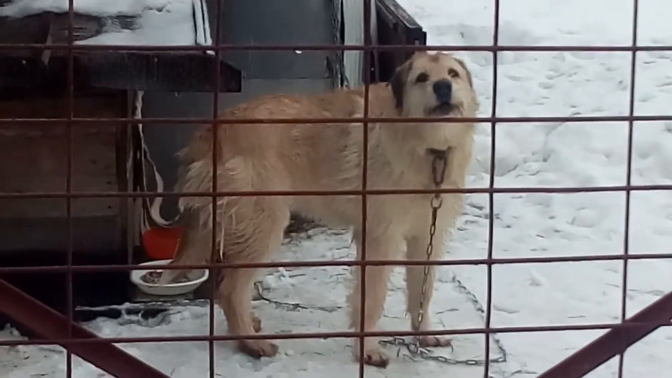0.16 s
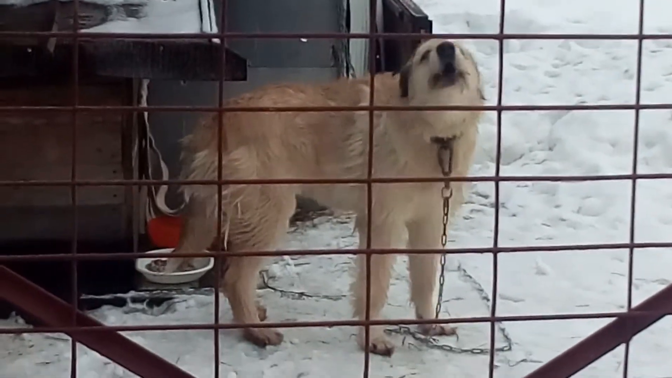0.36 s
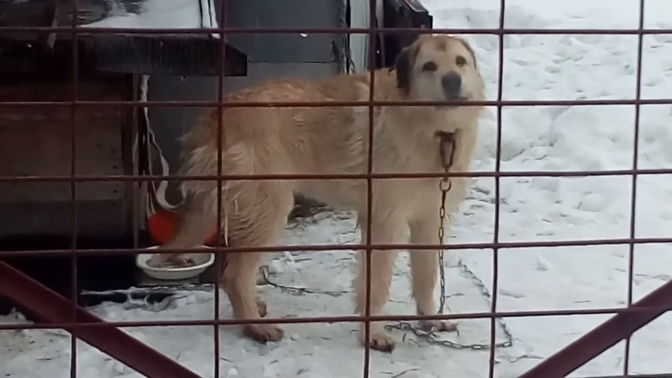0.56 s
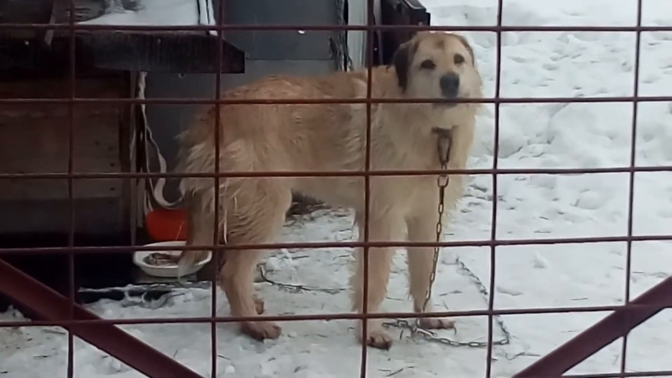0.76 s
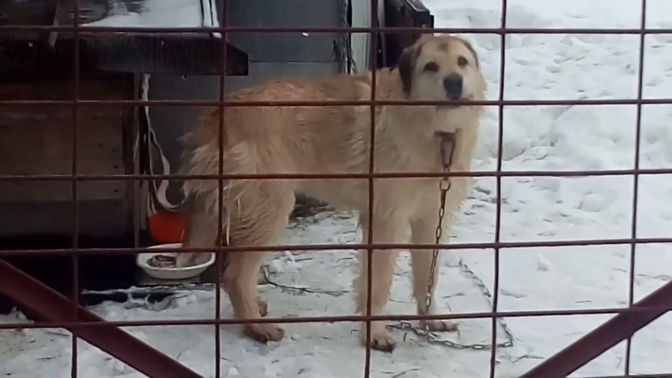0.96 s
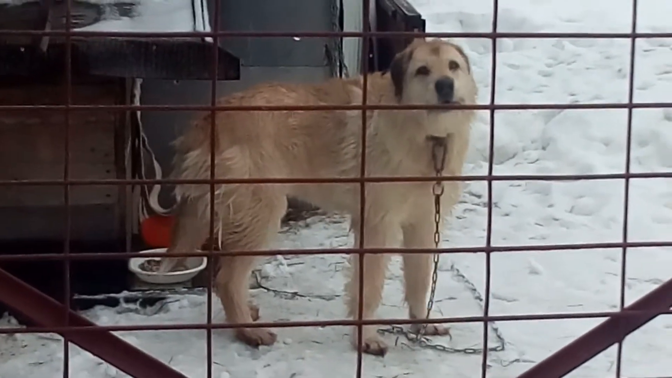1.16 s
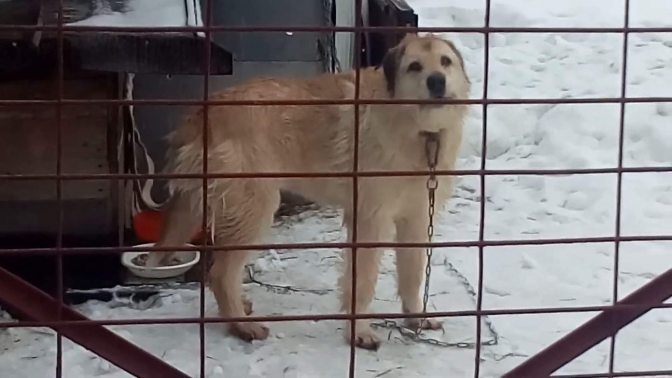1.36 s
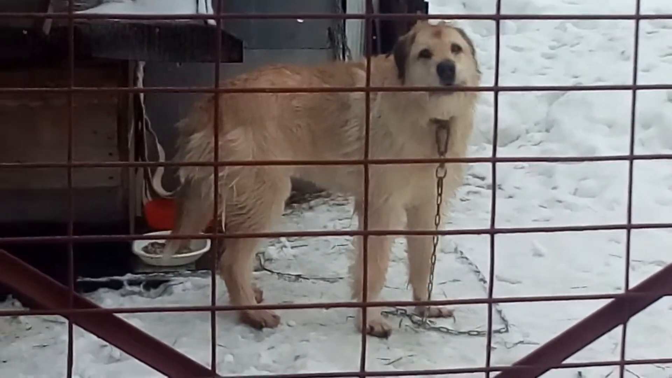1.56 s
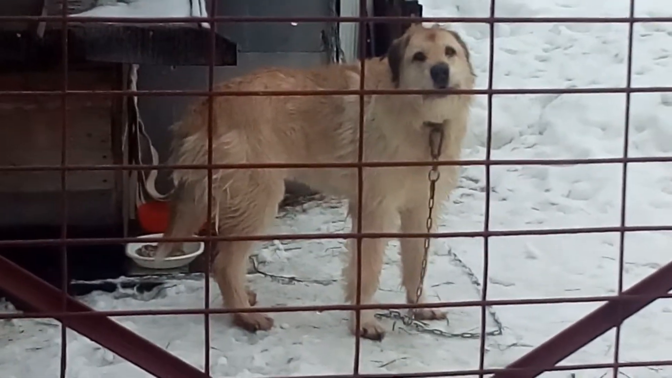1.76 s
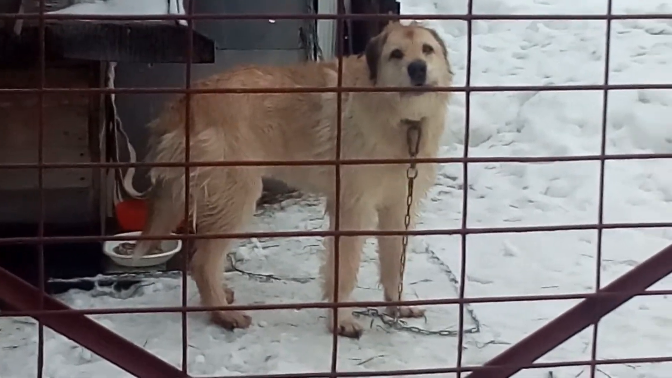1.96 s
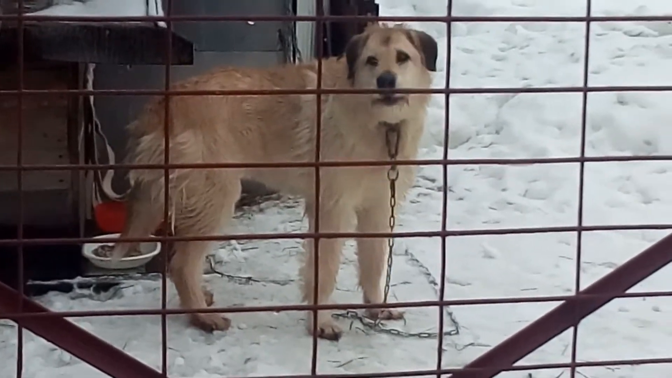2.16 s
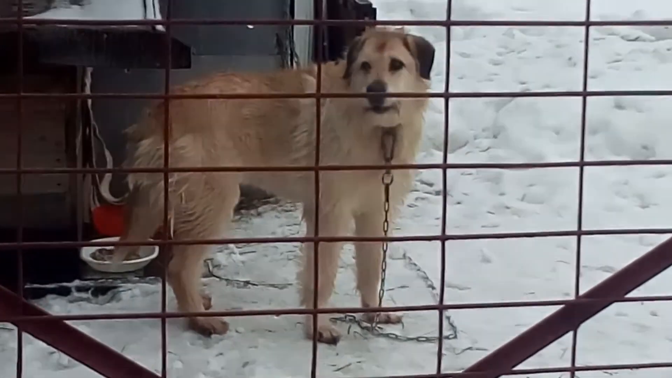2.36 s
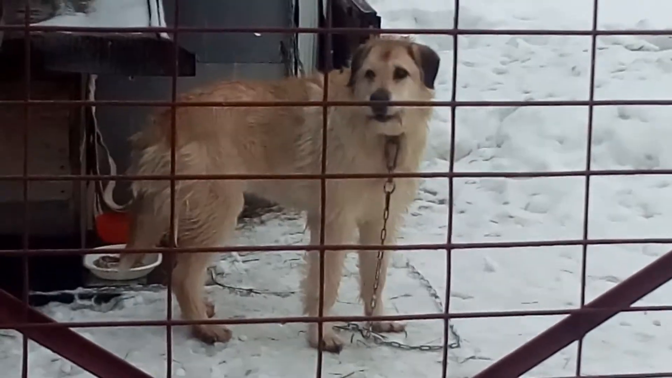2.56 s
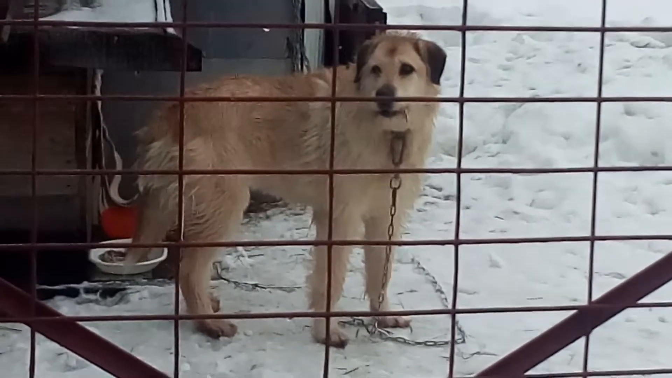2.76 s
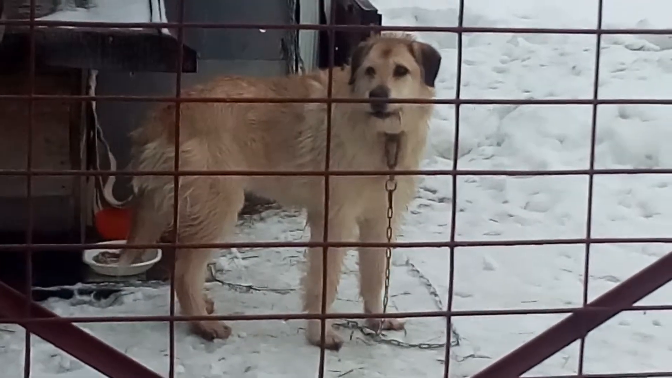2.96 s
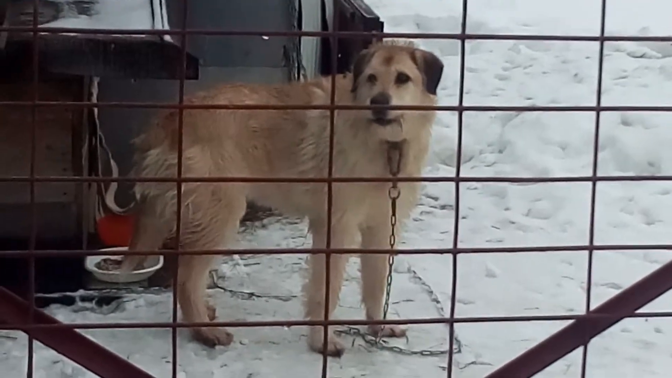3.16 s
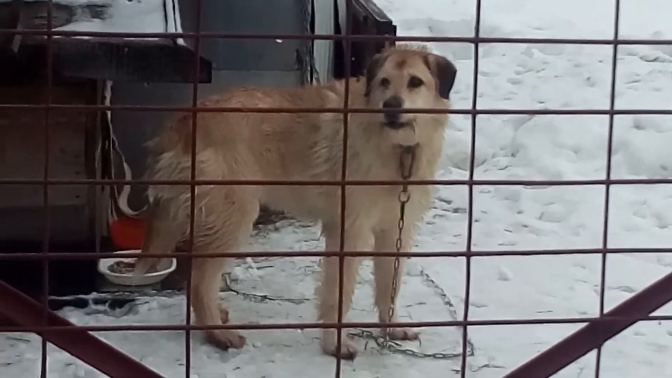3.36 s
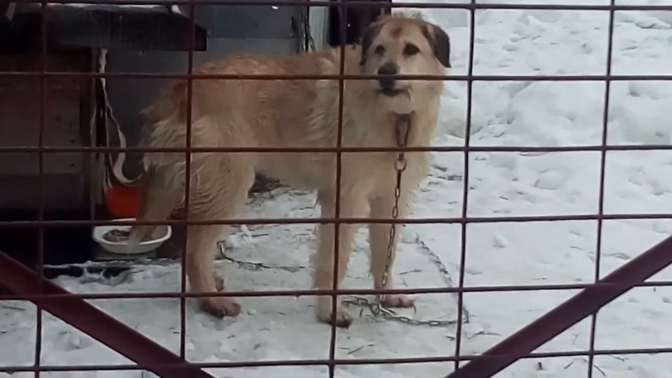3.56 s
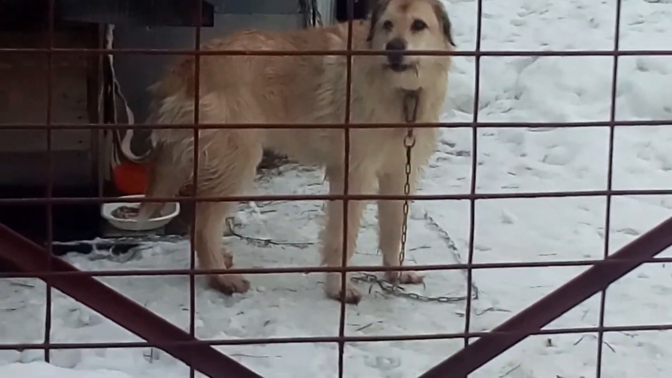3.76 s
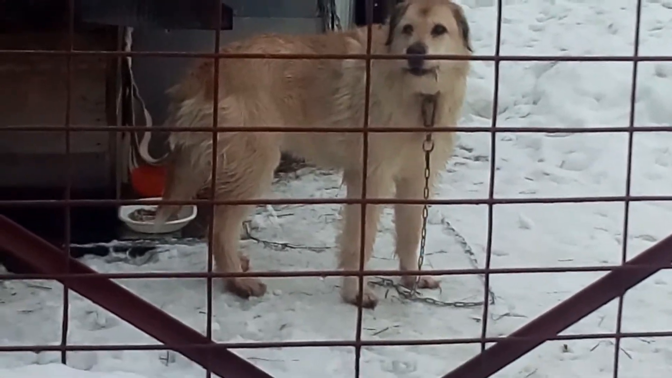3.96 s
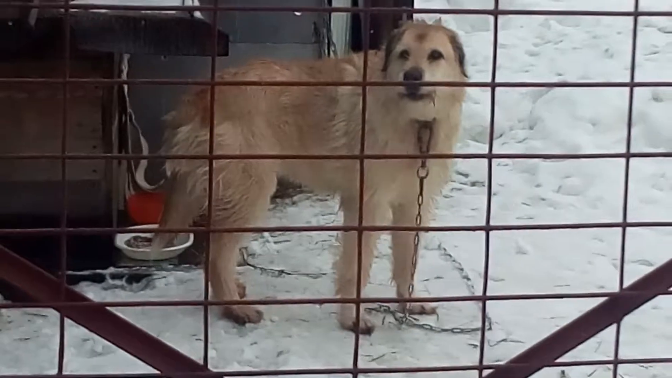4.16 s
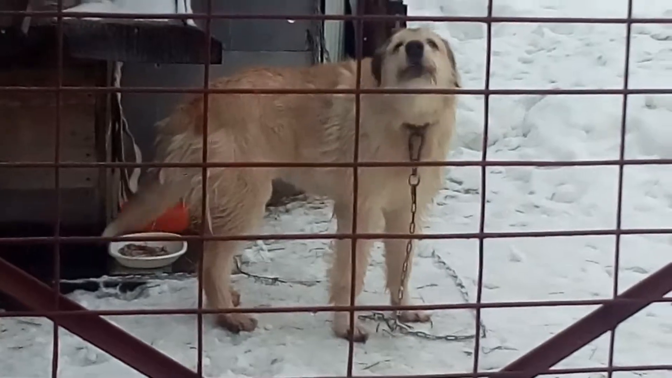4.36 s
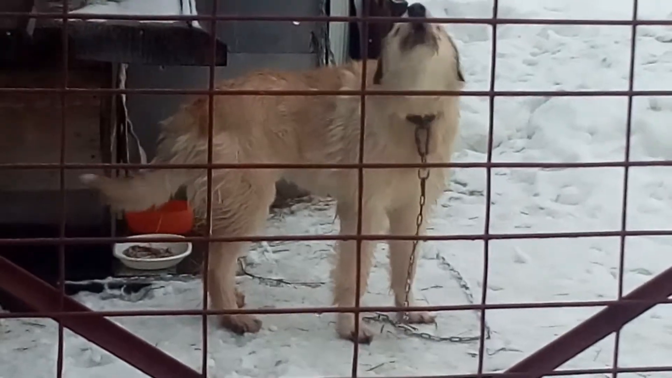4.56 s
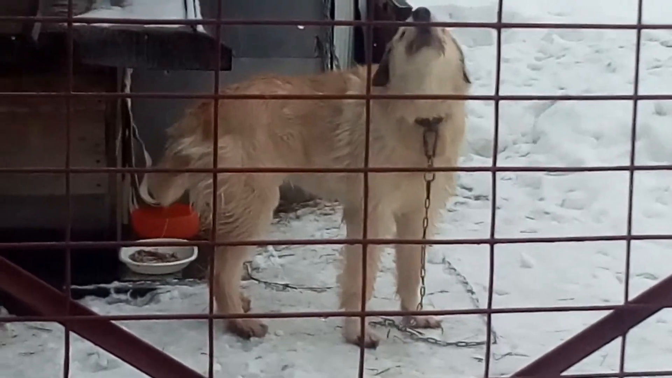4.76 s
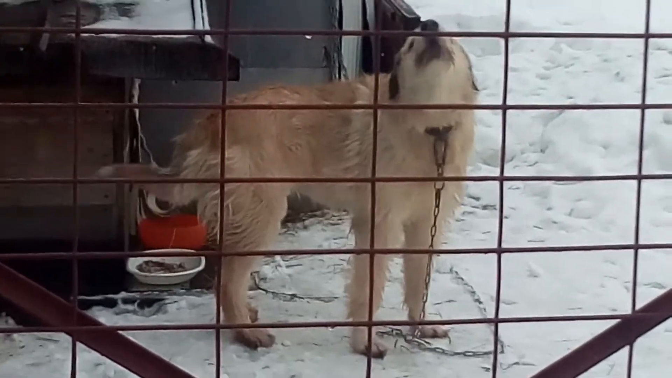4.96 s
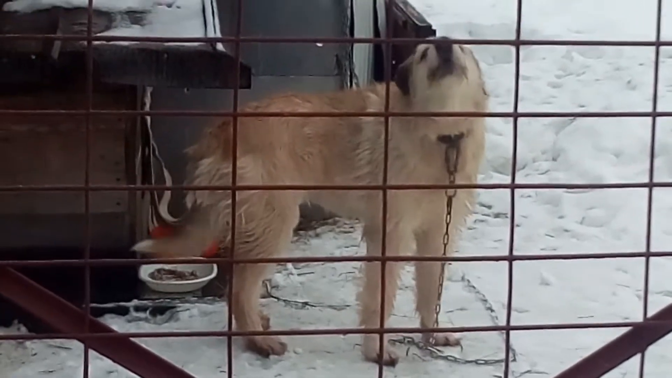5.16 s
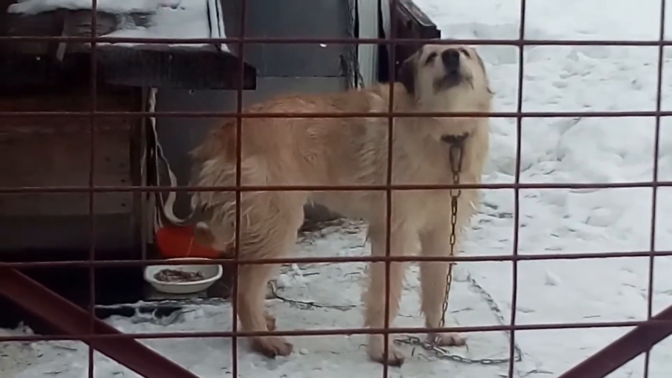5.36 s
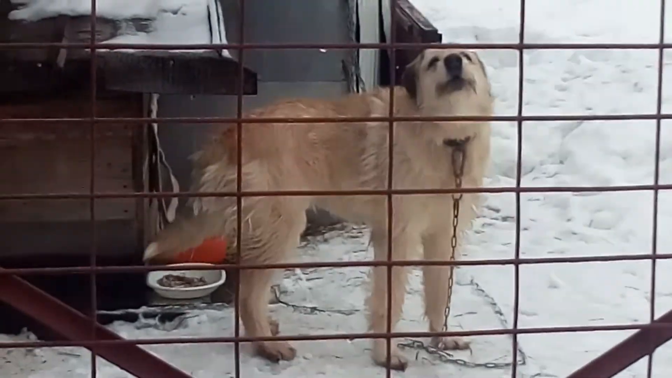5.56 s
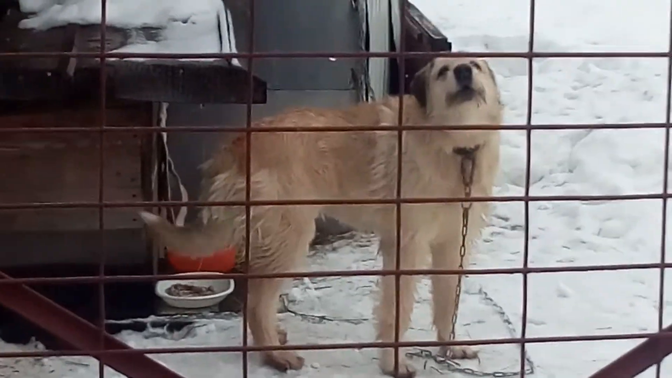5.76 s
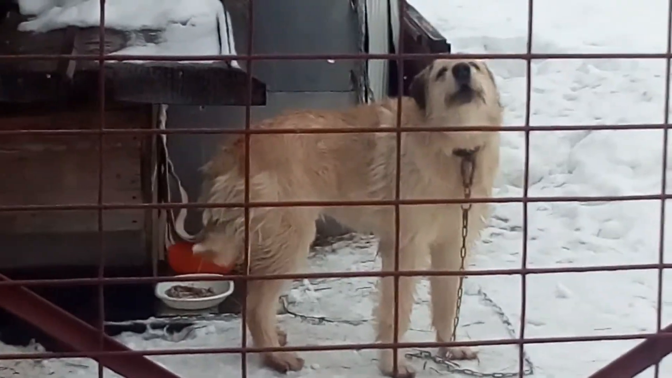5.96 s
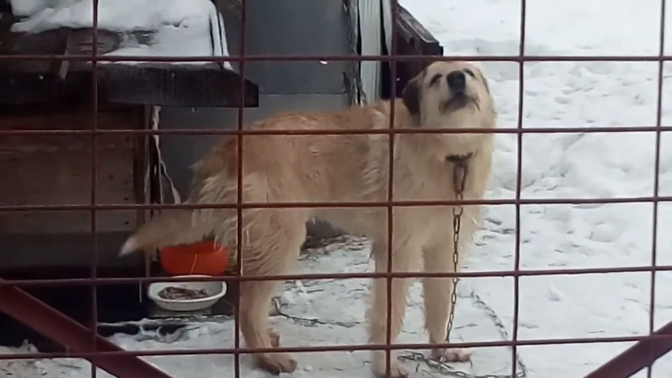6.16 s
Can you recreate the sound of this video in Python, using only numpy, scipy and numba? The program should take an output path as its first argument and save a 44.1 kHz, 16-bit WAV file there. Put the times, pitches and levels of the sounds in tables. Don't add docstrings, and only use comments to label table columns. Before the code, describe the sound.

A large dog gives one sharp, hoarse bark near the start, then barely grumbles while sparrows chirp far off and its fur brushes softly on wood. After a long pause come two quick barks, the second breaking into a short howl that wavers twice, drops to a low moan and creaks into a growl. One last bark ends it. Open snowy yard, close stereo phone microphone, light wind rumble and faint hiss.

```python
import sys
import numpy as np
from scipy import signal
from scipy.io import wavfile
from scipy.ndimage import uniform_filter1d
from numba import njit

SR = 44100
rng = np.random.default_rng(int(sys.argv[2]) if len(sys.argv) > 2 else 0)


def store_pcm(level_fs):
    pcm = np.round(np.clip(level_fs, -1, 1) * 32767).astype(np.int16)
    wavfile.write(sys.argv[1], SR, np.atleast_2d(pcm).T)


def decibels_to_gain(level_db):
    exponent = np.asarray(level_db, float) / 20
    return 10 ** exponent


N = 273772

# shut_jaw_db, open_jaw_db
BARK_COLOUR = [(-22, -4.5), (-30, -14.5), (-40, -18)]
GAPE_BOOST = [2.5, 18.5, -6]


def bark(start_s, length_s, top_hz, fall_db, gape):
    attack_s, shut_s, shut_db, peak_db = .08, .01825, -16, -14
    slack_pitch, pitch_lag_s = .7, .012
    t = np.linspace(0, length_s, num=40)
    burst = np.clip(t / attack_s, .2, 1)
    rise_db = 20 * 1.4 * np.log10(np.sin(np.pi / 2 * burst))
    sink_db = fall_db * (20 * np.maximum(t - attack_s, 0)) ** 1.3
    db = rise_db - sink_db + shut_db * np.clip(1 - (length_s - t) / shut_s, 0, 1)
    effort = decibels_to_gain(db)
    tension = np.interp(t - pitch_lag_s, t, effort) ** 1.1
    hz = top_hz * (slack_pitch + (1 - slack_pitch) * tension)
    rough = .8 + (.4 * gape - .8) * np.sqrt(effort)
    alternate = .2 + (.62 * gape - .2) * np.sqrt(effort)
    colour = BARK_COLOUR + (gape - 1) * np.array(GAPE_BOOST)[:, None]
    rows = voice_rows(start_s + t, hz, peak_db + db, gape * effort ** .66, rough, alternate, colour)
    howl_s = HOWL[0][0]
    return rows[(rows[:, 0] < howl_s - .02) | (start_s > howl_s)]


# time_s, pitch_hz, level_db, jaw_opening (0-1)
HOWL = [
    (4.536, 445.6, -15, 0.45),
    (4.598, 308.8, -18.5, 0.17),
    (4.65, 380.6, -17, 0.34),
    (4.696, 416, -13, 0.2),
    (4.748, 366, -19, 0.31),
    (4.802, 319.1, -17, 0),
    (4.858, 356, -20.5, 0.16),
    (4.91, 379.8, -17.5, 0.43),
    (4.968, 347.2, -20.5, 0.14),
]
# time_s, pitch_hz, level_db, jaw_opening (0-1)
MOAN = [
    (4.994, 295.6, -21.5, 0.077),
    (5.03, 227, -28, .03),
    (5.052, 193, -30.5, 0.025),
    (5.12, 202.2, -31, 0.017),
    (5.175, 185, -33.5, .02),
    (5.212, 158.5, -31, .02),
    (5.25, 139, -60, .02),
]
# shut_jaw_db, open_jaw_db
HOWL_COLOUR = [(-34, -4), (-24, -19.5), (-33.5, -18)]
MOAN_COLOUR = [(-14, -15), (-30.5, -10.5), (-44.5, -28.5)]


def cry():
    clears_s, creak_hz, strain_hz = .035, 160, 385
    parts = []
    for table, colour in ((HOWL, HOWL_COLOUR), (MOAN, MOAN_COLOUR)):
        s, hz, db, jaw = np.transpose(table)
        rasp = np.exp(-((s - HOWL[0][0]) / clears_s) ** 2 / 2)
        creak = np.clip(creak_hz / hz - 1, 0, 1) + np.clip(hz / strain_hz - 1, 0, 1) * (1 - rasp)
        rough = .05 + .2 * rasp + 1.5 * creak
        alternate = .025 + .65 * rasp + .5 * creak
        parts.append(voice_rows(s, hz, db, jaw, rough, alternate, colour))
    return np.concatenate(parts)


def voice_rows(s, hz, db, jaw, rough, alternate, colour):
    opening = np.sqrt(np.clip(jaw, 0, 1.2))
    layers = [shut_db + (open_db - shut_db) * opening for shut_db, open_db in colour]
    return np.transpose([s, hz, db, *layers, rough, alternate, jaw])


# start_s, length_s, top_pitch_hz, fall_db, gape (0-1)
BARKS = [
    (.267, .158, 469.1, 8, 0.98),
    (4.184, .21, 470.4, 11, 1),
    (4.418, .2, 474.4, 3, 0.86),
    (5.942, .186, 414, 11, 0.7),
]
# closed_hz, open_hz, width_hz, level_db
CHEST = [(310, 565, 436, 0.5), (628, 766, 423, 2.5)]
TONGUE = [(984, 1346, 213, 0)]
LIPS = [(1806, 2133, 563, 4), (2910, 2910, 405, -0.5)]
BREATH = [(4600, 5005, 340, 3), (5410, 5280, 980, 4), (6920, 6060, 600, 1.5), (6780, 7500, 87, -4)]
RASP = [(3800, 3800, 500, 6), (9300, 9300, 900, -2), (11600, 11600, 1400, -9), (14900, 14900, 1000, -7)]
# centre_hz, width_hz
SINUS_NOTCHES = [(1480, 170), (2330, 1940)]


def voice():
    first, second, third, last = (bark(*row) for row in BARKS)
    calls = [first, second, np.concatenate([third, cry()]), last]
    controls = np.array(in_time(calls) + [drift(130), drift(90), drift(64)])
    on = controls[8] > 0
    (pitch_hz, chest_db, tongue_db, lips_db, breath_db, rough, alternate, jaw,
     sounding, shake, flutter, gust) = controls[:, on]

    phase = 2 * np.pi * np.cumsum(pitch_hz * (1 + .1 * rough * shake)) / SR
    folds = 0
    for k in range(2, 31):
        odd = k % 2
        fade = np.clip(8 - k * pitch_hz / 900, 0, 1) / np.sqrt(k)
        folds = folds + (alternate if odd else 1) * np.cos(k * phase / 2 + odd * k * k) * fade
    puffs = (.5 + .5 * np.cos(phase)) * (1 + alternate * np.cos(phase / 2))
    air = puffs * rng.standard_normal(N)[on]
    closures = np.diff(np.floor(phase / 2 / np.pi), prepend=0)
    source = folds * decibels_to_gain(4 * rough * flutter) + 16 * rough ** 2 * air

    chest = band(throat(source, CHEST, jaw, lift_db=.8), 311, 866, order=3)
    chest = chest + decibels_to_gain(-14.5) * rough * rms_one(band(air, 220, 340))
    tongue = decibels_to_gain(tongue_db) * band(throat(source, TONGUE, jaw), 740, 1426)
    lips = decibels_to_gain(lips_db) * band(throat(source + 1.1 * air, LIPS, jaw), 1300, 2600)
    oral = np.array([chest + tongue, lips])
    for hz, width_hz in SINUS_NOTCHES:
        oral = oral - np.clip(1.25 - 8.3 * rough, 0, 1) * swallowed(oral, hz, width_hz)
    oral = oral - np.clip(1.3 - 4.5 * jaw, 0, .85) * swallowed(oral, 720, 170)

    snaps = (.8 + 2.5 * rough) * air + 9 * closures
    breath = band(throat(snaps * decibels_to_gain(2.35 * gust), BREATH, jaw), 4690, 7800)
    rasp = throat(air, RASP, np.ones_like(jaw))
    breath = breath + decibels_to_gain(-5.5) * rough * np.sqrt(np.abs(jaw)) * rasp
    out = np.zeros((2, N))
    out[:, on] = sounding * decibels_to_gain(chest_db - .14) * (oral + [[.6], [.4]] * decibels_to_gain(breath_db) * breath)
    return out


def throat(x, modes, jaw, lift_db=0):
    widen = np.clip(.5 + .67 * jaw, .3, 2)
    out = 0
    for k, (shut_hz, open_hz, width_hz, db) in enumerate(modes):
        lift = decibels_to_gain(lift_db) if k else 1
        out = out + decibels_to_gain(db) * lift * resonate(x, shut_hz + (open_hz - shut_hz) * jaw, width_hz * widen)
    return out / np.sqrt(np.abs(uniform_filter1d(out ** 2, size=900)) + 1e-9)


def resonate(x, hz, width_hz):
    r = np.exp(-np.pi * width_hz / SR)
    pull = 2 * r * np.cos(2 * np.pi * hz / SR)
    return glide(glide(x, pull, r), pull, r)


@njit
def glide(x, pull, r):
    y = np.zeros(len(x))
    for i in range(2, len(x)):
        push = (1 - r[i] * r[i]) / 2 * (x[i] - x[i - 2])
        y[i] = push + pull[i] * y[i - 1] - r[i] * r[i] * y[i - 2]
    return y


def swallowed(x, hz, width_hz):
    return signal.lfilter(*signal.iirpeak(hz, hz / width_hz, SR), x)


# time_s, level_db
GROWL = [
    [(1.37, -74), (1.594, -54), (1.77, -70.5), (1.87, -60), (1.915, -66)],
    [(1.92, -66), (1.99, -53), (2.17, -52.5), (2.29, -69), (2.44, -76)],
    [(4.36, -45), (4.392, -38), (4.42, -43)],
    [(5.222, -35.5), (5.347, -41.5), (5.465, -37.5), (5.655, -50), (5.92, -49), (5.948, -42)],
    [(6.1, -38.5), (6.15, -47), (6.208, -50.5)],
]
# closed_hz, open_hz, width_hz, level_db
CLOSED_MOUTH = [(322.4, 328, 129, 6), (660, 665, 190, -4.5), (976, 1400, 135, -14), (1880, 1850, 97, -39)]


def growl():
    slaps_per_s = 108
    growl_db, sounding = in_time(GROWL)
    upper_db = -6 + np.clip(growl_db + 47, 0, 10)
    cycles = np.cumsum(slaps_per_s * decibels_to_gain(2.5 * drift(25))) / SR
    slaps = np.diff(np.floor(cycles), prepend=0) * decibels_to_gain(.95 * drift(53)) + .013 * rng.standard_normal(N)
    on, out = sounding > 0, np.zeros(N)
    out[on] = throat(slaps[on], CLOSED_MOUTH, np.zeros(on.sum()), upper_db[on])
    out[on] += decibels_to_gain(-15) * rms_one(band(slaps[on], 159, 210))
    return sounding * decibels_to_gain(growl_db + 1.6 * drift(18)) * out


# start_s, length_s, level_db
BRUSHES = [(0.136, 0.046, -59), (.663, .16, -65), (.95, 0.24, -69), (1.495, 0.25, -66.5),
           (1.804, 0.13, -64.5), (1.995, 0.15, -66), (2.328, 0.078, -64), (2.485, 0.098, -66),
           (2.791, .022, -64.5), (2.86, 0.068, -65), (2.996, 0.065, -61), (3.382, 0.051, -67.5),
           (3.445, .09, -59.5), (3.861, .1, -72), (3.929, 0.083, -57), (4.932, 0.059, -61),
           (5.326, 0.28, -60.5), (5.412, .07, -55), (5.905, 0.11, -52.5)]


def brushes():
    white = rng.standard_normal((2, N)) * decibels_to_gain(3.8 * drift(340))
    dull, bright = rms_one(band(white, 1500, 6500)), rms_one(band(white, 6000, 13000))
    fur = dull + decibels_to_gain(-24.5) * bright
    out = np.zeros((2, N))
    for start_s, length_s, db in BRUSHES:
        i, n = int(start_s * SR), int(length_s * SR) + 64
        stroke = np.sin(np.pi * np.linspace(0, 1, n) ** .64)
        out[:, i:i + n] += decibels_to_gain(db) * stroke * fur[:, i:i + n]
    return out


# start_s, from_hz, to_hz, level_db
CHIRPS = [(.162, 3110, 2920, -73), (5.2, 3730, 4160, -71), (.735, 3260, 2760, -67),
          (0.784, 3840, 4600, -79.5), (.82, 4930, 4960, -77.5), (0.923, 4500, 3760, -73.5),
          (0.943, 3500, 2850, -74), (1.065, 3200, 3060, -74), (1.125, 3360, 3880, -67.5),
          (1.196, 4020, 4130, -67.5), (1.19, 3410, 3520, -69.5), (1.278, 3900, 4060, -64),
          (1.27, 4700, 4500, -69), (1.31, 3110, 3155, -67), (1.374, 3700, 3050, -76),
          (1.485, 4320, 3670, -73), (2.394, 5100, 4700, -70.5), (2.49, 2650, 2720, -76),
          (2.525, 5550, 5160, -76.5), (2.551, 3373, 3160, -71), (2.665, 6350, 4520, -78),
          (2.717, 4170, 4280, -70.5), (2.75, 4230, 2775, -66.5), (3.0, 3690, 4290, -71),
          (3.069, 3800, 3520, -70.5), (3.2, 4050, 3280, -69.5), (3.453, 4420, 4300, -75),
          (4.138, 4140, 4041, -73), (5.521, 2950, 2970, -71), (5.83, 3993, 3840, -72.5)]


def sparrows():
    chirp_s, flock_calls, answer_s = .043, 130, .12
    when, pitch, glide_by, loud, after = rng.random((flock_calls, 5)).T
    answered_s = np.array(CHIRPS)[(when * len(CHIRPS)).astype(int), 0]
    flock_s = answered_s + answer_s * (2 * after - 1)
    flock_hz = 2300 + (6000 - 2300) * pitch
    flock = np.transpose([flock_s, flock_hz, flock_hz * (.7 + .5 * glide_by), -87 + 8 * loud])
    out = np.zeros(N)
    for start_s, from_hz, to_hz, db in [*CHIRPS, *flock]:
        i, n = int(start_s * SR), int(chirp_s * SR) + 64
        phase = 2 * np.pi * np.cumsum(np.linspace(from_hz, to_hz, n)) / SR
        out[i:i + n] += decibels_to_gain(db + 16) * np.sqrt(np.hanning(n)) * np.sin(phase)
    return out * (.6 + .6 * drift(250))


# time_s, level_db
WHINE = [(0.0, -63), (2.2, -71.5), (3.6, -64.5), (6.21, -59)]


def whine():
    tone = np.sin(2 * np.pi * 1251.3 * np.arange(N) / SR)
    return np.sqrt(2) * decibels_to_gain(in_time([WHINE])[0] + 1.6 * drift(17)) * tone


# peak_s, half_width_s, level_db
LOW_SWELLS = [(.36, 0.12, -48.5), (.78, 0.056, -54.5), (1.2, 0.16, -65), (2.13, 0.12, -51.5),
              (2.769, .06, -67.5), (3.44, 0.023, -67.5), (3.87, 0.046, -69), (4.271, 0.061, -46),
              (4.7, 0.39, -52.5), (5.45, .2, -58.5), (6.02, 0.15, -51)]


def wind():
    shared, left, right = band(rng.standard_normal((3, N)), 44, 190, order=3)
    t = np.arange(N) / SR
    blow = decibels_to_gain(-68.5)
    for peak_s, width_s, db in LOW_SWELLS:
        blow = blow + decibels_to_gain(db) * np.exp(-((t - peak_s) / width_s) ** 2)
    return blow * decibels_to_gain(-2.5 + 2.5 * drift(4)) * rms_one(shared + .6 * np.array([left, right]))


# pitch_hz, level_db (per Hz)
YARD = [(30, -24), (60, -2), (120, -1), (300, -3.5), (700, -6), (1500, -12.5), (3000, -15.5), (5000, -21),
        (6500, -26.5), (8500, -51), (12000, -36.5), (15000, -31.5)]
# pitch_hz, likeness (0-1)
YARD_LIKENESS = [(60, 0.38), (300, 0.96), (1400, 0.17), (3100, 0.13), (7000, 0.17), (15000, .1)]


def yard():
    out, edges_hz = 0, 30 * 2 ** np.arange(0, 9.1, .5)
    white, together = rng.standard_normal((2, 2, N)), decibels_to_gain(.8 * drift(4))
    tone_hz, tone_db = np.transpose(YARD)
    like_hz, likeness = np.transpose(YARD_LIKENESS)
    for k, (low_hz, high_hz) in enumerate(zip(edges_hz, edges_hz[1:])):
        mid, side = band(white[k % 2], low_hz, high_hz)
        place = np.log(low_hz * high_hz) / 2
        alike = np.interp(place, np.log(like_hz), likeness)
        level = decibels_to_gain(np.interp(place, np.log(tone_hz), tone_db))
        spread = np.sqrt(1 + alike) * mid + np.sqrt(1 - alike) * side * [[1], [-1]]
        out = out + level * together * spread
    return decibels_to_gain(-63) * out / np.std(band(out[0, :SR], 330, 15100))


# left_delay_s, right_delay_s, level_db
ECHOES = [(.0006, .0021, -17.5), (.0043, .0031, -22.5), (.011, .014, -25), (.029, .024, -23.5),
          (.052, .061, -18), (.095, .088, -31), (.15, .17, -39), (.23, 0.15, -39.5)]


def echoes(x, wall_hz):
    dull, out = band(x, 150, wall_hz, order=1), np.zeros((2, N))
    for k, (left_s, right_s, db) in enumerate(ECHOES):
        for side, delay_s in enumerate((left_s, right_s)):
            lag = int(delay_s * SR) + 1
            out[side, lag:] += (-1) ** k * decibels_to_gain(db) * dull[:-lag]
    return out


def scatter(x, t60_s):
    t = np.arange(SR // 2) / SR
    tail = rng.standard_normal((2, len(t))) * decibels_to_gain(-60 * t / t60_s) * (t > .012)
    return signal.oaconvolve(x[None], tail / np.sqrt(np.sum(tail ** 2) / 2), axes=1)[:, :N]


def rms_one(x):
    return x / np.sqrt(np.mean(x ** 2) + 1e-20)


def in_time(tables):
    t, rows = np.arange(N) / SR, np.concatenate(tables)
    sounding = sum((t >= table[0][0]) & (t <= table[-1][0]) for table in tables) > 0
    curves = [np.interp(t, rows[:, 0], column) for column in rows[:, 1:].T]
    return [uniform_filter1d(curve, size=400) for curve in curves + [sounding * 1.]]


def drift(rate_hz):
    low = signal.butter(2, rate_hz, fs=SR, output="sos")
    return rms_one(signal.sosfilt(low, rng.standard_normal(N + SR))[SR:])


def band(x, low_hz, high_hz, order=2):
    return signal.sosfilt(signal.butter(order, [low_hz, high_hz], "band", fs=SR, output="sos"), x)


def scene():
    (body, lips), birds = voice(), sparrows()
    dog = body + lips + growl() + 1e-9 * rng.standard_normal(N)
    beamed = decibels_to_gain([[-4], [-10]]) * np.array([-np.roll(lips, 37), np.roll(lips, 30)])
    far = yard() + wind() + birds + decibels_to_gain(-.5) * scatter(birds, t60_s=.19) + brushes()
    far[0] = np.roll(far[0], 19)
    near = dog * decibels_to_gain([[.7], [-.7]]) + beamed + echoes(dog, wall_hz=4500)
    near = near + decibels_to_gain(-35.5) * scatter(band(dog, 200, 3500), t60_s=.4)
    return near + far * decibels_to_gain([[.4], [-.4]]) + whine()


def top_cut(x):
    return signal.sosfilt(signal.butter(12, 15710, fs=SR, output="sos"), x)


def record(dry):
    thump = band(dry ** 2, 25, 180)
    rounded = .9 * np.tanh(dry / .9)
    return top_cut(rounded + .064 * thump)


dry = scene()
out = record(dry)
store_pcm(out)
```